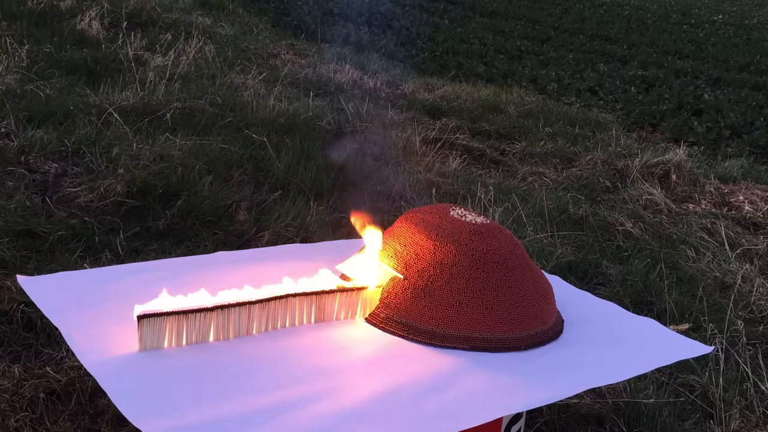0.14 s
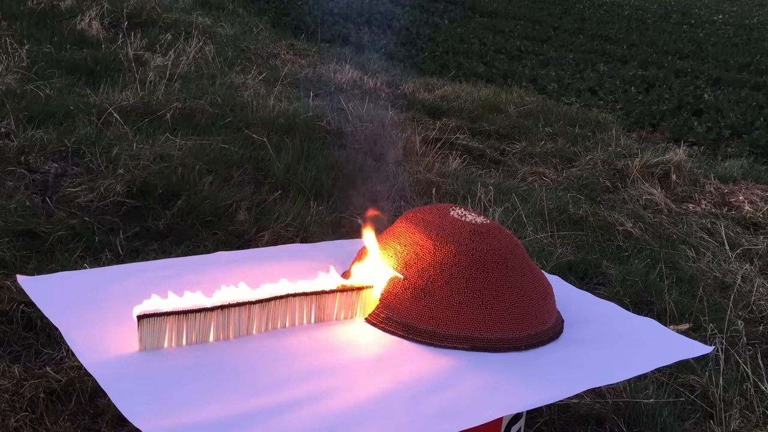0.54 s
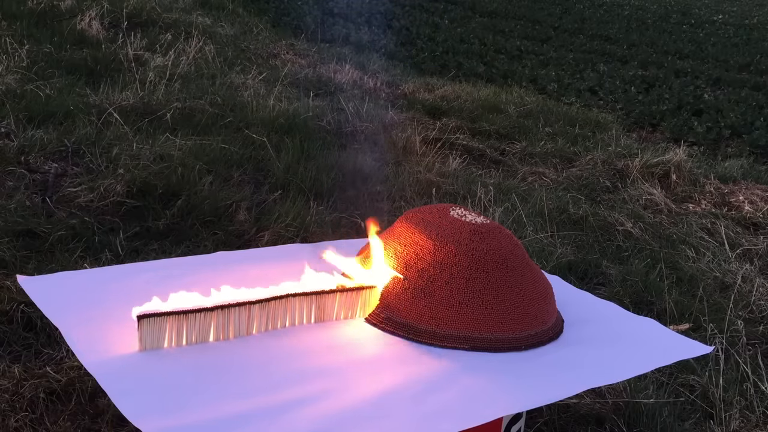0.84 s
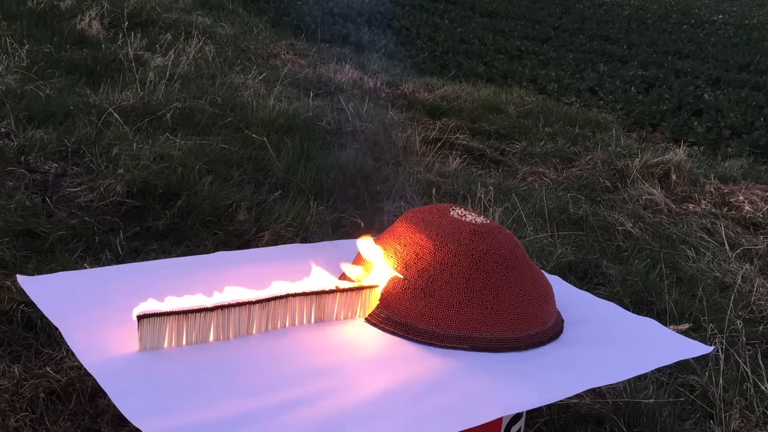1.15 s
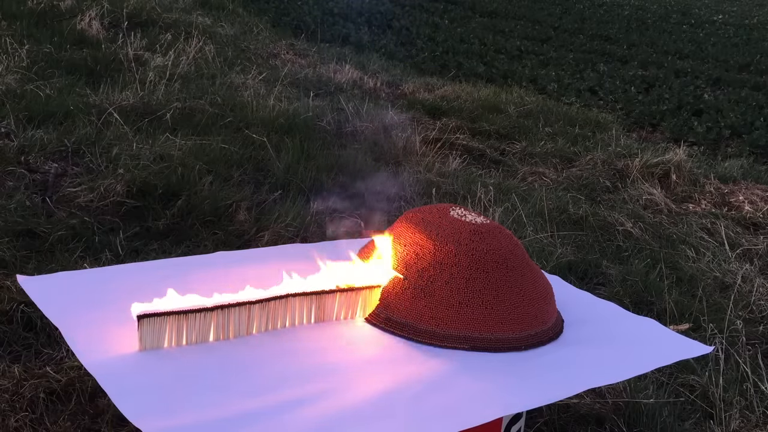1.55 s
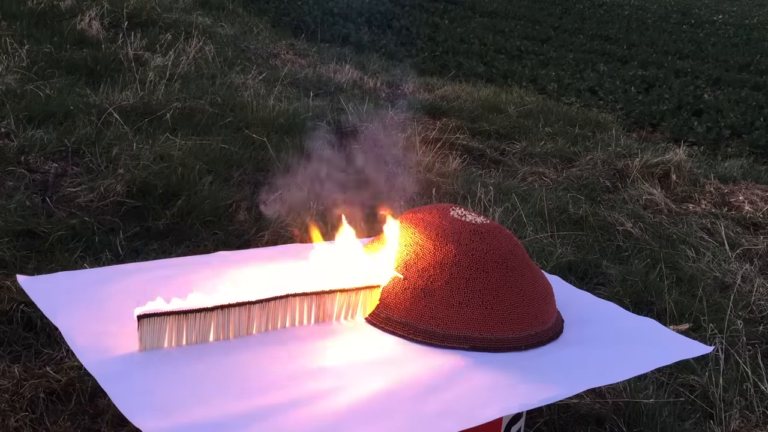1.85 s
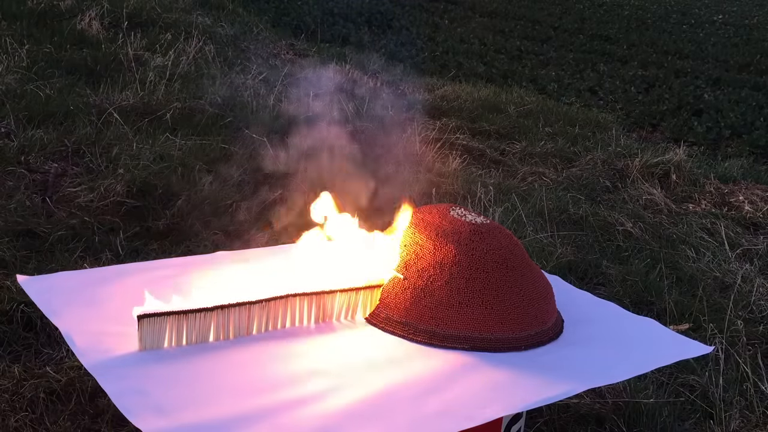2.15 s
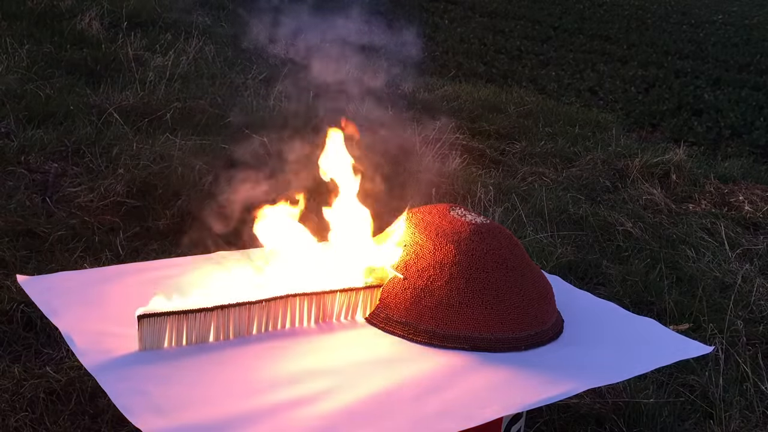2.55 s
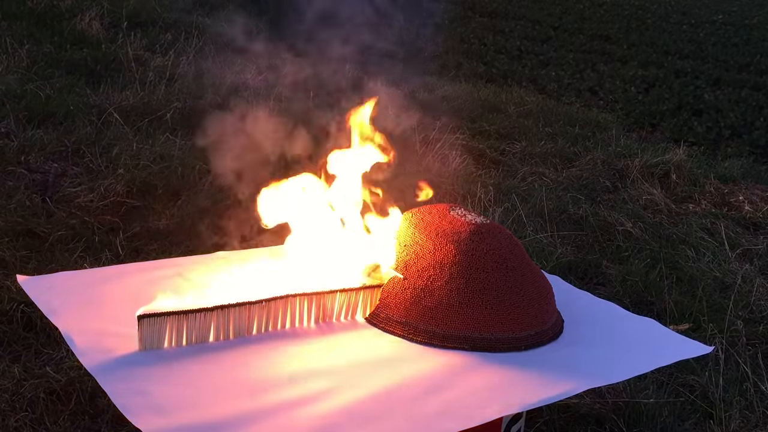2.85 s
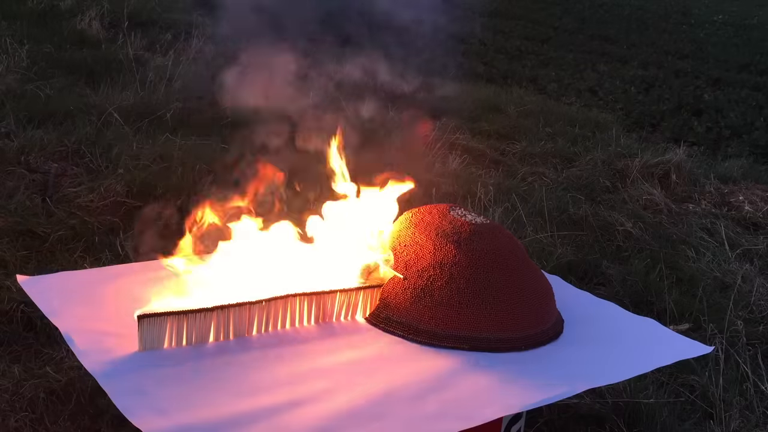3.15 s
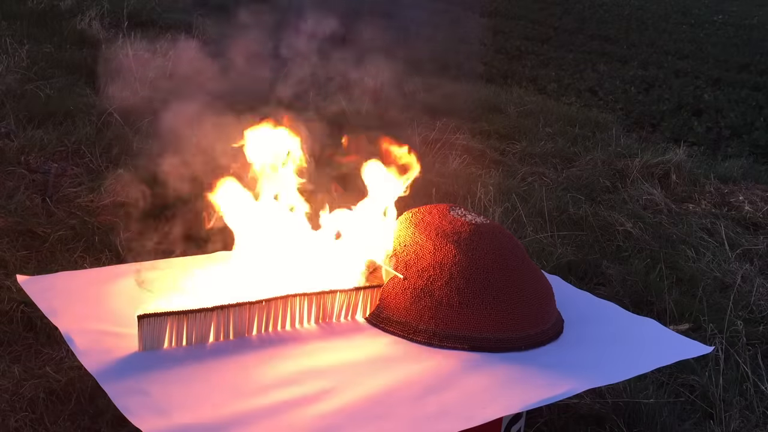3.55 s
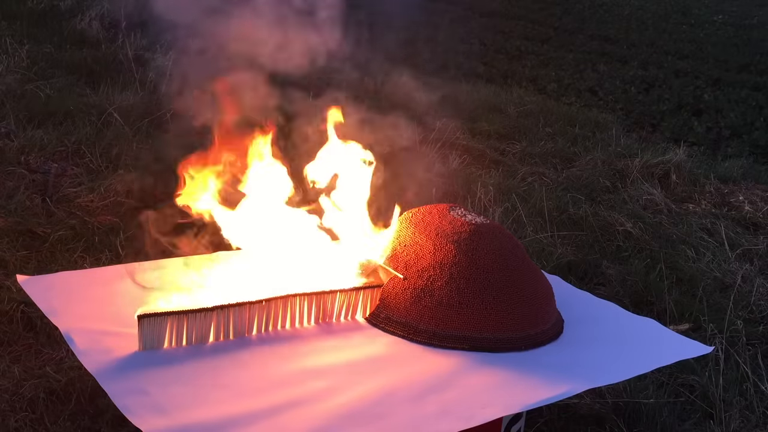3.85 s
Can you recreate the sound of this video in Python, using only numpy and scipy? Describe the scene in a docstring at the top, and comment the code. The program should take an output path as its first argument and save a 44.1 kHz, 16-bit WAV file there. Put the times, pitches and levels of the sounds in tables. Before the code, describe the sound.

A row of matches burns with a faint hiss, then swells into a crackling, popping roar.

```python
"""A long row of matches burns outdoors, a little way from the microphone: patchy, grainy noise for roar and fizz.
Single heads flare and tick at first; then the fire spreads into a fizzing roar, growing louder and brighter
over a fluttering rumble of flame. Pockets of gas burst as swelling waves of falling pitch, and splitting heads
add higher snaps with thin noise cracks. Behind it, a low drone of slowly wandering sines fades far away,
over faint filtered noise of the open air."""
import sys
import numpy as np
from scipy import signal
from scipy.fft import rfft, irfft, next_fast_len
from scipy.io import wavfile
from scipy.ndimage import uniform_filter1d, map_coordinates

SR = 44100
rng = np.random.default_rng(int(sys.argv[2]) if len(sys.argv) > 2 else 0)


def wrap_up_sound(samples):
    """Save the sound to the file named by the first command line argument, as 16-bit audio."""
    columns = np.atleast_2d(samples).T
    # keep every value between -1 and 1, then stretch to whole-number steps
    tamed = np.clip(columns, -1, 1)
    steps = np.round(tamed * 32767).astype(np.int16)
    wavfile.write(sys.argv[1], SR, steps)


N = 176400
TIME = np.arange(N) / SR

# Single heads flaring up: top at t/s, rise/s, fall/s, roar level/dB, fizz level/dB
HEAD_FLARES = [(0.026, .012, .018, -52.5, -58.5), (.082, 0.022, 0.024, -55.5, -59),
               (.585, 0.045, 0.055, -62.5, -62), (0.788, 0.016, .012, -51.5, -55.5),
               (1.291, 0.012, 0.011, -46.5, -62), (1.81, 0.011, 0.035, -63, -60),
               (2.345, 0.027, 0.028, -45, -45.5), (2.95, 0.054, 0.049, -45.5, -44.5),
               (3.14, 0.024, 0.05, -38.5, -60), (3.225, 0.021, 0.026, -39.5, -46),
               (3.38, 0.018, 0.033, -37, -44)]
# Colour of the roar while the fire is small, also of the sputter before a pop: f/Hz, relative level/dB
YOUNG_COLOUR = [(120, -11), (260, -14.5), (400, -7), (620, -1.5), (900, -2.5), (1200, 1), (1800, 3.5),
                (2400, -0.5), (3200, -4), (3900, -23.5), (4800, -33), (8000, -42)]


def amp(db):
    """Decibels to gain."""
    return 10 ** (np.asarray(db) / 20)


def unit(x):
    """Scale to rms 1."""
    return x / np.sqrt(np.mean(x ** 2) + 1e-20)


def curve(rows):
    """Straight lines through (t/s, value) points, one value per sample."""
    s, value = np.transpose(rows)
    return np.interp(TIME, s, value)


def wobble(rate):
    """A smooth random curve through normal draws, rate knots a second."""
    knots = rng.standard_normal(2048)
    return map_coordinates(knots, [TIME * rate], mode="wrap")


def filtered(x, response):
    """Filter x in the spectrum by a gain that depends on frequency in Hz."""
    m = next_fast_len(N + SR // 2)  # padded so that the end does not wrap to the start
    gain = response(np.fft.rfftfreq(m, 1 / SR))
    return irfft(rfft(x, m) * gain, m)[:N]


def coloured(x, points):
    """Filter x by a curve of (f/Hz, level/dB) points over log frequency, then scale to rms 1."""
    f, db = np.transpose(points)
    return unit(filtered(x, lambda hz: amp(np.interp(np.log(hz + 1), np.log(f), db))))


def rush(patchy_db):
    """White noise whose gain varies in random patches of time and frequency, patchy_db rms."""
    spectrum = signal.stft(rng.standard_normal(N), nperseg=512)[2]
    field = uniform_filter1d(rng.standard_normal(spectrum.shape), size=7, axis=0)
    field = uniform_filter1d(field, size=9, axis=1)
    patchy = spectrum * amp(patchy_db * unit(field))
    return unit(signal.istft(patchy, nperseg=512)[1][:N])


def grains(per_s, scatter_db):
    """Single-sample clicks of random sign at random moments, a few much larger than the rest."""
    size = amp(scatter_db * np.minimum(rng.exponential(size=N), 4))
    strikes = rng.random(N) < per_s / SR
    return unit(strikes * size * rng.choice([-1, 1], N))


def burst(s, pitch_hz, cycles, spread):
    """A swelling pocket of gas whose pitch falls as 1/age; gives the first sample and the wave, loudest at s."""
    peak_s = cycles / pitch_hz
    log_age = np.log(np.arange(1, SR // 25) / SR / peak_s)
    swell = np.exp(-.5 * (log_age / spread) ** 2)
    return round((s - peak_s) * SR), swell * np.cos(2 * np.pi * cycles * log_age)


def add(track, start, wave):
    """Mix a wave into a track, cut at the track's end."""
    part = track[start:start + len(wave)]
    part += wave[:len(part)]


def air():
    """Faint noise of the open air, steady in level."""
    # f/Hz, relative level/dB
    air_colour = [(25, -18), (50, 0.5), (170, 1.5), (260, -4), (400, -4.5), (520, -5.5), (680, -1),
                  (900, -11.5), (1300, -12), (1800, -23), (2800, -20), (4000, -16.5), (8000, -43)]
    return amp(-62) * coloured(rng.standard_normal(N), air_colour)


def wandering_tone(hz):
    """A sine at rms 1 whose pitch drifts by about one percent."""
    pitch_hz = hz * (1 + 0.01 * wobble(5.97))
    return np.sqrt(2) * np.sin(2 * np.pi * np.cumsum(pitch_hz) / SR)


def hum():
    """A low drone far away fades, with a fainter whir above it that stays."""
    # Drone: t/s, level/dB before the trim
    drone_level = [(0, -59), (.07, -52.5), (.25, -55), (.4, -64), (.55, -66), (.8, -59), (1.02, -57),
                   (1.3, -64), (1.45, -66), (1.6, -73), (4, -76)]
    trim_db, whir_db = -2, -72
    drone = amp(curve(drone_level) + trim_db + wobble(11.2)) * wandering_tone(56.5)
    whir = amp(whir_db + wobble(4.7)) * wandering_tone(121)
    return drone + whir


def scatter(x):
    """Sound thrown back by the table and the ground: a short diffuse tail of decaying noise."""
    level_db, t60_s, onset_s = -19, 0.043, 0.006
    t = np.arange(SR // 8) / SR
    tail = rng.standard_normal(len(t)) * amp(-60 * t / t60_s) * (1 - np.exp(-t / onset_s))
    return amp(level_db) * signal.fftconvolve(x, tail / np.linalg.norm(tail))[:N]


def soften(x):
    """Low-pass the bursts, which hold little above about 4 kHz."""
    return filtered(x, lambda hz: 1 / (1 + (hz / 4050) ** 10))


def snaps():
    """Match heads split with a short tonal snap and a thin noise crack that dies at once."""
    # Peak at t/s, peak level/dB before softening, pitch at the peak/Hz, crack level relative to that peak/dB
    snap_events = [(0.023, -39, 1800, -24), (0.032, -43, 1900, -22), (0.057, -43, 2000, -16),
                   (.083, -39.5, 1500, -24), (.535, -44, 2000, -18), (.640, -43, 1510, -28),
                   (0.6632, -39.5, 1510, -28), (0.7922, -33, 1700, -30), (.7945, -25.5, 2650, -30),
                   (.796, -37, 2820, -30), (.845, -43, 980, -22), (.892, -40, 2800, -16),
                   (1.233, -36.5, 2400, -5), (1.29, -45, 1800, -26), (1.2938, -40, 2000, -24),
                   (1.619, -35, 1700, -24), (1.759, -29.5, 1800, -21), (1.931, -26.5, 1490, -26),
                   (1.9447, -28, 2220, -26), (1.980, -25, 2120, -26), (2.010, -28.5, 2200, -24),
                   (3.1455, -17.5, 2500, -18), (3.1492, -37, 2500, -22)]
    crack_decay_s = 0.00091
    bodies, cracks = np.zeros(N), np.zeros(N)
    t = np.arange(SR // 50) / SR
    for s, db, pitch_hz, crack_db in snap_events:
        start, wave = burst(s, pitch_hz, cycles=1.7, spread=0.29)
        add(bodies, start, amp(db) * wave)
        crack = np.exp(-t / crack_decay_s) * rng.standard_normal(len(t))
        add(cracks, round(s * SR), amp(db + crack_db) * crack)
    return soften(bodies) + cracks


def pops():
    """Gas pockets sputter, burst with a round falling pop and push out a low puff."""
    # Peak at t/s, peak level/dB before softening, pitch at the peak/Hz,
    # cycles while the pitch falls to 1/e, spread of the swell in natural-log time
    pop_events = [(1.9274, -39.5, 383, 2.04, 0.61), (2.1853, -22, 910, 1.37, 0.52),
                  (2.2755, -24, 1120, 3.7, 0.17), (2.5461, -32, 650, 1.6, 0.52),
                  (2.7163, -18.5, 1610, 1.35, 0.6), (2.7470, -14, 1500, 1.18, 0.71),
                  (2.758, -29, 1120, 1.1, 0.76), (2.8887, -9, 1450, 1.14, 0.48),
                  (2.8909, -13.5, 2350, 0.9, 0.34), (2.9793, -15.5, 2170, 1.85, 0.63),
                  (2.98, -19.5, 690, 0.53, 0.88), (3.1044, -8.5, 3030, 1.7, 0.49),
                  (3.1048, -4.5, 1017, 0.9, .57), (3.4010, -34, 820, 1.54, 0.6),
                  (3.5730, -29.5, 700, 1.43, 0.62), (3.6979, -10, 1540, 3.7, 0.27),
                  (3.6995, -18.5, 640, 0.52, 1), (3.7625, -7.5, 2120, 2.1, 0.22),
                  (3.7633, -14, 610, 0.92, 0.55), (3.8160, -7, 1350, 0.71, 0.45),
                  (3.888, -22, 1130, 0.91, 0.77), (3.927, -25.5, 500, 1.8, 0.38),
                  (3.9589, -13, 1780, 2.1, 0.42)]
    puff_db, puff_hz, puff_spread = -30, 147, 0.35  # level relative to the pop
    lead_db, lead_s = -21, 0.0033  # sputter level relative to the pop, time constant of its rise
    bursts, sputter_level = np.zeros(N), np.zeros(N)
    t = np.arange(SR // 50) / SR
    rise = np.exp(-t[::-1] / lead_s)
    for s, db, pitch_hz, cycles, spread in pop_events:
        start, wave = burst(s, pitch_hz, cycles, spread)
        add(bursts, start, amp(db) * wave)
        start, wave = burst(s + .5 / puff_hz, puff_hz, 1.0, puff_spread)
        add(bursts, start, amp(db + puff_db) * wave)
        add(sputter_level, round(s * SR) - len(t), amp(db + lead_db) * rise)
    sputter = sputter_level * coloured(rng.standard_normal(N), YOUNG_COLOUR)
    return soften(bursts + sputter)


def flame():
    """The body of flame flutters and rumbles: low patchy noise with a quick random level."""
    # t/s, level/dB before the trim
    rumble_level = [(0, -66), (.5, -70), (1.0, -64), (1.7, -78), (2.15, -69), (2.3, -57), (2.6, -61.5),
                    (2.8, -55), (3.15, -58), (3.31, -53.5), (3.45, -52), (3.62, -48), (4, -45.5)]
    # f/Hz, relative level/dB
    rumble_colour = [(25, -34), (45, -8), (70, -2), (110, 2.5), (170, -3.5), (250, -15), (500, -14),
                     (1200, -45)]
    trim_db = 3.5
    level_db = curve(rumble_level) + trim_db + 1.6 * wobble(16)
    return amp(level_db) * coloured(rush(patchy_db=1.0), rumble_colour)


def flare_shape(s, rise, fall):
    """Power of one flare: a bell with its own rise and fall, 1 at the top."""
    return np.exp(-((TIME - s) / np.where(TIME < s, rise, fall)) ** 2)


def flare_fizz():
    """Single heads hiss as they flare: bright patchy noise in brief swells."""
    # f/Hz, relative level/dB
    flare_colour = [(2500, -12), (4800, -11), (7300, -2.5), (9000, -8), (10400, -3.5), (11500, 0),
                    (12800, -1.5), (14500, -11), (15800, -10)]
    power = np.zeros(N)
    for s, rise, fall, _, fizz_db in HEAD_FLARES:
        power += flare_shape(s, rise, fall) * amp(fizz_db) ** 2
    return np.sqrt(power) * coloured(rush(patchy_db=1.5), flare_colour)


def fizz(flicker_db):
    """The sparking tips fizz: bright noise and sizzling grains, duller while the fire is small."""
    # t/s, level/dB before the trim
    fizz_level = [(0, -63.5), (.3, -66.5), (1.2, -66.5), (1.6, -63), (1.76, -61.5), (1.83, -56),
                  (2.13, -51.5), (2.19, -53.5), (2.31, -47.5), (2.58, -49.5), (2.75, -47), (2.97, -50),
                  (3.04, -50.5), (3.22, -50.5), (3.3, -51.5), (3.38, -48.5), (3.66, -44), (4, -50)]
    # f/Hz, relative level/dB
    fizz_colour = [(2500, -13), (4800, -9), (5600, 0), (6900, 1), (8500, -2), (9600, 0.5), (10400, -2.5),
                   (11500, 1), (13000, -2.5), (15800, -3)]
    trim_db, sizzle_db = 3, -8.5  # sizzle relative to the noise
    young_dull_db, dull_hz = -2.5, 12600  # a small fire has less of the finest fizz
    sizzle = amp(sizzle_db) * grains(per_s=350, scatter_db=4.5)
    sparks = coloured(rush(patchy_db=2.16) + sizzle, fizz_colour)
    finest = filtered(sparks, lambda hz: 1 - 1 / (1 + (hz / dull_hz) ** 20))
    young = np.interp(TIME, [1.7, 1.85], [1, 0])
    sparks = sparks + young * (amp(young_dull_db) - 1) * finest
    return amp(curve(fizz_level) + trim_db + flicker_db + .55 * wobble(25.15)) * sparks


def roar(flicker_db):
    """The burning heads roar: noise and crackling grains that turn brighter, with flares adding power."""
    # t/s, level/dB before flicker and flares
    roar_level = [(0, -59.5), (.3, -64.5), (.62, -61), (1.1, -61), (1.45, -58), (1.68, -55.5),
                  (1.83, -48.5), (2.02, -45.5), (2.13, -44.5), (2.21, -46), (2.35, -44), (2.52, -41),
                  (2.85, -41), (3.05, -40), (3.3, -40.5), (3.5, -33), (3.66, -32), (4, -34)]
    # How far the roar has turned from young to full colour: t/s, share [0 to 1]
    growth = [(1.95, 0.07), (2.4, 0.35), (3.0, 0.63), (3.2, 0.95), (3.3, 0.84), (3.58, 1), (3.72, 0.91),
              (4, 0.81)]
    # f/Hz, relative level/dB
    full_colour = [(120, -38), (260, -19), (400, -12), (600, -6), (800, -10.5), (1200, -2), (1900, 0.5),
                   (2600, -1), (3300, -1), (4200, -6.5), (5000, -15), (6500, -21.5), (10000, -56)]
    crackle_db = -5  # relative to the noise
    power = amp(curve(roar_level) + flicker_db + 0.56 * wobble(45)) ** 2
    for s, rise, fall, roar_db, _ in HEAD_FLARES:
        power += flare_shape(s, rise, fall) * amp(roar_db) ** 2
    crackle = amp(crackle_db) * grains(per_s=400, scatter_db=5.0)
    gas = unit(rush(patchy_db=2) + crackle)
    grown = np.clip(curve(growth), 0, 1)
    blend = (1 - grown) * coloured(gas, YOUNG_COLOUR) + grown * coloured(gas, full_colour)
    return np.sqrt(power) * blend


def burning():
    """The row of heads burns: roar and fizz flicker together, single heads flare above them."""
    flicker_db = .5 * wobble(14)
    return roar(flicker_db) + fizz(flicker_db) + flare_fizz()


def scene():
    """The fire with its pops and snaps, in open air."""
    blows = pops() + snaps()
    background = hum() + air()
    return (background + scatter(blows) + blows + flame() + burning())[None]


def record(dry):
    """The microphone passes little of the deepest bass; the recorder keeps nothing above its band limit."""
    low_cut_hz, top_hz = 28, 15900
    return filtered(dry[0], lambda hz: (1 - 1 / (1 + (hz / low_cut_hz) ** 4)) * (hz < top_hz))[None]


dry = scene()
out = record(dry)
wrap_up_sound(out)
```